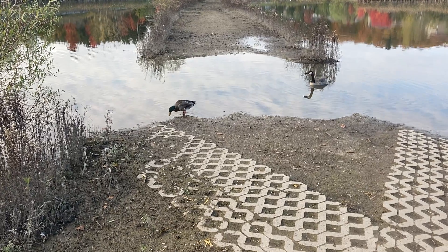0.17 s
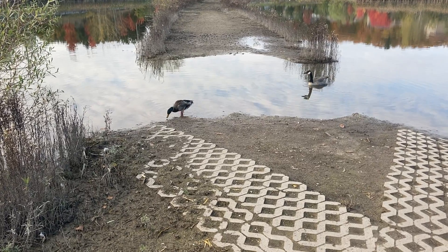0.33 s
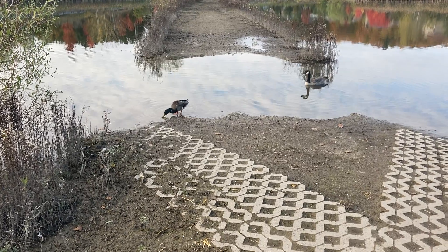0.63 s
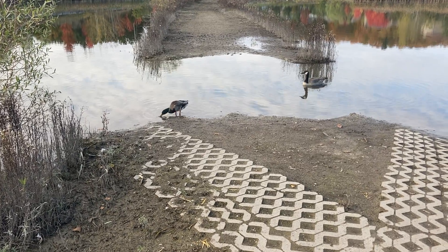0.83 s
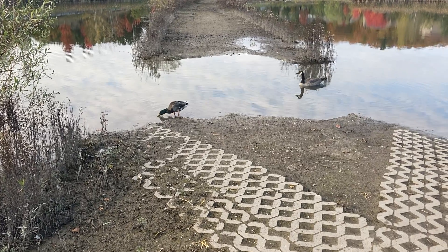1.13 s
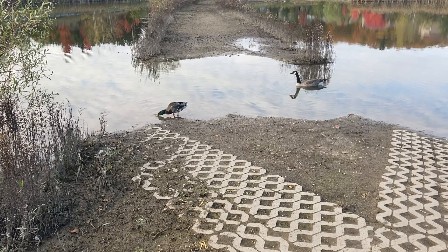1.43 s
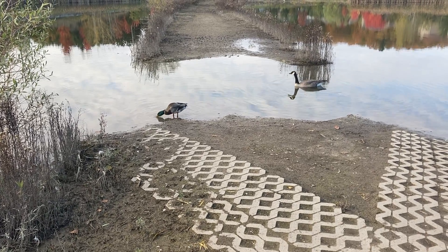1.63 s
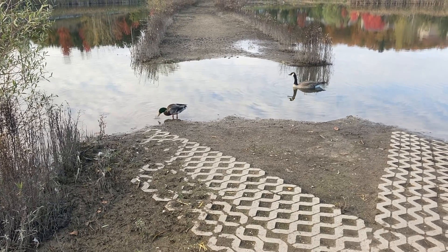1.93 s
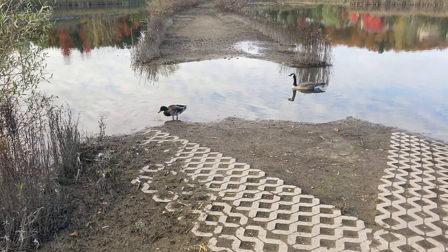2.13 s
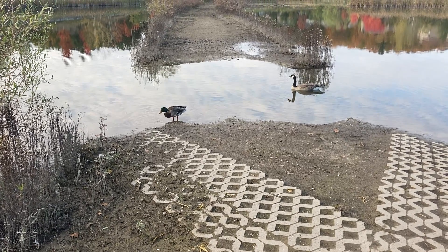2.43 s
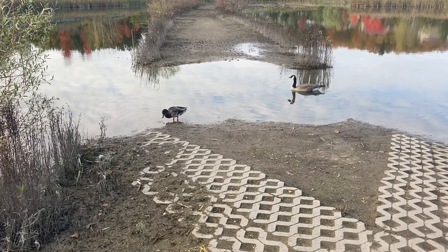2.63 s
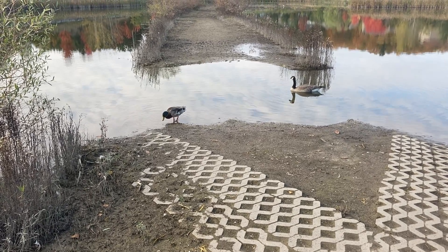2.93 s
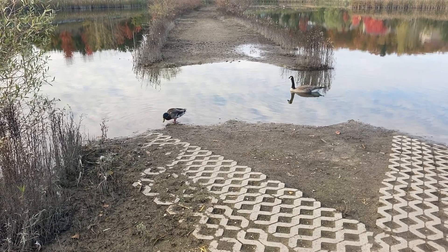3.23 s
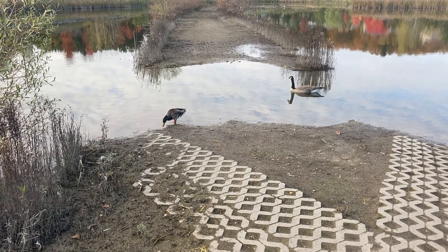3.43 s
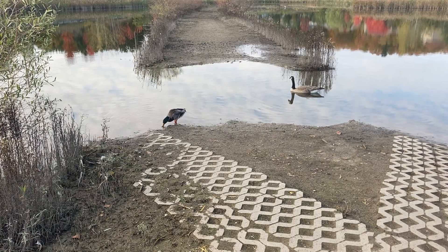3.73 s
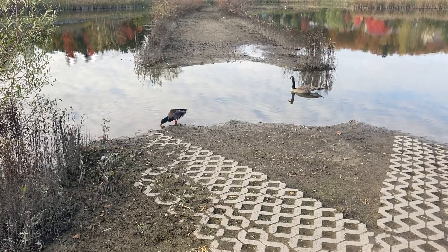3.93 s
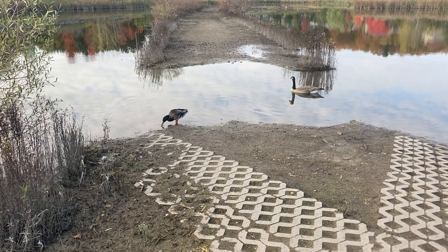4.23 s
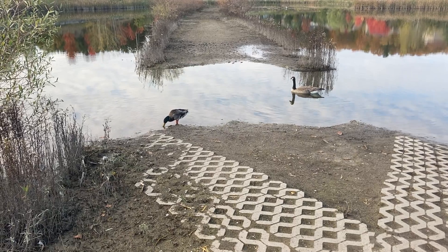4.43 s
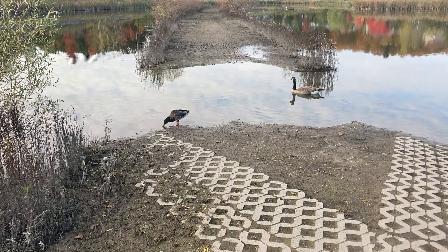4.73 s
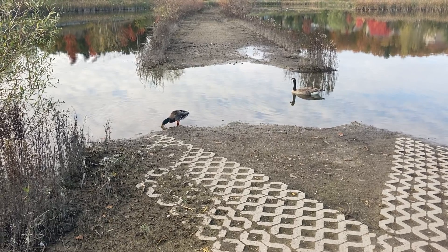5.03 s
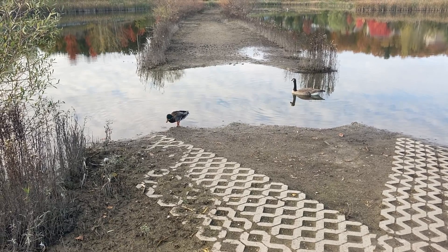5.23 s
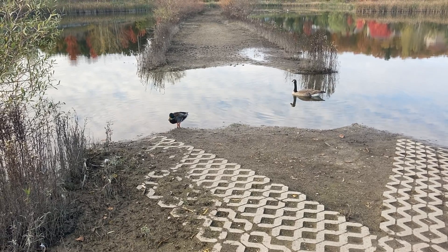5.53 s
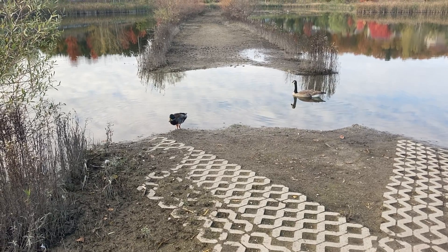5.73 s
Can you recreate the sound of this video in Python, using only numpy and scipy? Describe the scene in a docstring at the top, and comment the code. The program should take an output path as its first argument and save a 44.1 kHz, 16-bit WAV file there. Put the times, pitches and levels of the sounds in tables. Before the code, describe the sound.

A throaty eight-cylinder vehicle drones past on the left beside a calm pond, revving and easing off three times before receding.

```python
"""A V8 vehicle drives past beside a pond, off to the left, revving up and easing off three times.
Its cylinders puff unevenly into two exhaust pipes: a lopsided burble at light throttle, a fuller drone
under load. Coloured noise makes the fan and intake rush, and one cylinder chuffs once a cycle.
Soft thumps of air, faint dry crackle, a thin rattle and far squeaks pass over calm air,
and the banks answer the vehicle with a diffuse echo."""
import sys
import numpy as np
from scipy import signal
from scipy.fft import rfft, irfft, next_fast_len
from scipy.io import wavfile
from scipy.ndimage import map_coordinates

SR = 44100
rng = np.random.default_rng(int(sys.argv[2]) if len(sys.argv) > 2 else 0)


def dump_mix(stems):
    """Bounce the given channels to the path in sys.argv[1] as a 16-bit WAV at rate SR."""
    frames = np.atleast_2d(stems).T  # one column per channel
    limited = np.clip(frames, -1, 1)  # hard clip at full scale
    pcm = np.round(limited * 32767).astype(np.int16)
    wavfile.write(sys.argv[1], SR, pcm)


N = 258867

IDLE_HZ = 100  # firings per second
PASS_S, PASS_WIDTH_S = 2.83, 0.51  # nearest moment; time to drive as far as the road is distant
IDLE_BRIGHT_DB, BRIGHT_DB_PER_OCTAVE = -6.5, 18  # the upper orders of the puffs grow with engine speed
TOP_HZ = 15100


def amp(db):
    """Decibels to gain."""
    return 10 ** (np.asarray(db) / 20)


def unit(x):
    """Scale to rms 1."""
    return x / np.sqrt(np.mean(x ** 2) + 1e-20)


def seconds():
    """Time of every sample."""
    return np.arange(N) / SR


def along(points, hz):
    """Read (frequency, value) points on a log frequency axis."""
    f, v = np.transpose(points)
    return np.interp(np.log(hz + 1), np.log(f + 1), v)


def curves(rows):
    """One value per sample for each column after the time."""
    s, *columns = np.transpose(rows)
    return [np.interp(seconds(), s, column) for column in columns]


def filtered(x, response):
    """x times a response of frequency."""
    size = next_fast_len(N + 8192)
    hz = np.fft.rfftfreq(size, 1 / SR)
    return irfft(rfft(x, size) * response(hz), size)[..., :N]


def coloured(x, spectrum):
    """x with the given colour, at rms 1."""
    return unit(filtered(x, lambda hz: amp(along(spectrum, hz))))


def noise(spectrum):
    """Coloured noise of rms 1."""
    return coloured(rng.standard_normal(N), spectrum)


def ring(x, spectrum, size=16384):
    """x through a causal (minimum-phase) body of the given colour."""
    hz = np.fft.rfftfreq(size, 1 / SR)
    cepstrum = irfft(np.log(amp(along(spectrum, hz))))
    # folding the cepstrum makes the body answer only after it is struck
    cepstrum[1:size // 2] *= 2
    cepstrum[size // 2 + 1:] = 0
    response = irfft(np.exp(rfft(cepstrum)))
    return signal.fftconvolve(x, response)[:N]


def resonant(table, hz):
    """Gain of (centre_hz, width_hz, gain_db) resonances at the given frequencies."""
    return sum(amp(db) / np.hypot(1, 2 * (hz - centre) / width) ** 2 for centre, width, db in table)


def wobble(rate):
    """A smooth random curve with rate knots a second."""
    knots = rng.standard_normal(int(N * rate / SR) + 4)
    return map_coordinates(knots, [np.arange(N) * rate / SR])


def swell(s, rise, fall):
    """A smooth bump of height 1 at time s."""
    t = seconds() - s
    return np.exp(-.5 * (t / np.where(t < 0, rise, fall)) ** 2)


def turning(middle_s, turn_s):
    """A smooth turn from 0 to 1, halfway at middle_s."""
    return 1 / (1 + np.exp((middle_s - seconds()) / turn_s))


def blows(rows, t60, attack_s):
    """Envelope of (start_s, level_db) blows that rise quickly and die away."""
    age = np.arange(SR // 8) / SR
    out = np.zeros(N)
    for s, db in rows:
        out[round(s * SR):][:len(age)] += amp(db - 60 * age / t60) * (1 - np.exp(-age / attack_s))
    return out


# engine speed: time_s, firing_rate_hz
ENGINE_SPEED = [(0.0, 98.09), (0.38, 110.74), (1.14, 132.78), (1.76, 153.43), (2.0, 157.25), (2.32, 137.19),
                (2.67, 142.07), (2.79, 145.62), (3.03, 147.16), (3.56, 153.02), (3.79, 125.82),
                (3.88, 120.83), (4.43, 124.36), (5.3, 128.77), (5.44, 113.66), (5.63, 101.61),
                (5.87, 99.51)]


def firing_rate():
    """Firings per second of all cylinders together."""
    return curves(ENGINE_SPEED)[0]


def revs():
    """Engine speed in octaves above idle."""
    return np.log2(firing_rate() / IDLE_HZ)


def passing(idle_db, octave_db, falloff):
    """Gain of an engine noise: it grows with speed and falls with a power of the distance."""
    distance = np.hypot(1, (seconds() - PASS_S) / PASS_WIDTH_S)
    return amp(idle_db + octave_db * revs()) / distance ** falloff


# the driver's throttle: time_s, exhaust_gain_db (before each layer's own gain), load (0-1)
THROTTLE = [(0.0, 28.5, 0.5), (0.3, 28.5, 0.48), (0.9, 30.5, 0.69), (1.4, 34.5, 0.81), (1.7, 36.5, 0.9),
            (2.05, 37.5, 0.97), (2.4, 36.5, 0.74), (2.7, 36.5, 0.9), (3.0, 38, 0.95), (3.675, 37, 1.0),
            (3.715, 36.5, 0.63), (4.05, 34, 0.65), (4.8, 31.5, 0.62), (5.3, 32.5, 0.68), (5.5, 32, 0.55),
            (5.87, 28, 0.6)]


def drive():
    """Exhaust gain (dB), load (0-1) and brightness (dB); brightness follows engine speed."""
    level_db, load = curves(THROTTLE)
    return level_db, load, IDLE_BRIGHT_DB + BRIGHT_DB_PER_OCTAVE * revs()


# in firing order: pipe (0 or 1), strength_coasting, strength_loaded (both relative, before scatter),
# lateness_coasting, lateness_loaded (firing intervals, before jitter)
CYLINDERS = [(0.0, 0, 0.78, 0.3, 0.179), (1.0, 0.0, 0.32, 0.32, 0.038), (0.0, 0.0, 0.45, 0.83, 0.63),
             (1.0, 0.16, 0.29, 0.5, 0.077), (1.0, 0.58, 0.1, 0.22, 0.27), (0.0, 0.33, 0.5, 0.66, 0.082),
             (1.0, 0.14, 0.15, 0.52, -0.075), (0.0, 1, 0.47, 0.42, -0.068)]
# colour of each exhaust pipe: frequency_hz, gain_db
PIPE_A = [(30.0, -28), (55.0, -29), (78.0, 11.5), (105.0, 6), (150.0, -2.5), (190.0, -2.5), (225.0, -3),
          (255.0, -3.5), (310.0, -41), (360.0, -19.5), (440.0, -24), (510.0, -20), (600.0, -31.5),
          (900.0, -75)]
PIPE_B = [(30.0, -28.5), (55.0, -2.5), (78.0, 14), (105.0, 2.5), (150.0, 17), (190.0, 13), (225.0, -15),
          (255.0, 0.5), (310.0, 2.5), (360.0, -10.5), (440.0, -17), (510.0, -18), (600.0, -53.1),
          (900.0, -77.5)]
# colour of the turbulent exhaust gas: frequency_hz, level_db (per Hz, relative)
GAS = [(20, -13.5), (45, -7), (80, -8), (170, -12.5), (300, -2), (420, -3.5), (520, -30), (700, -39),
       (1200, -45), (3000, -100)]


def exhaust(firings, knee_hz=220, pulse_db=-6, gas_db=-78, gas_load_db=4):
    """One puff per firing rings its pipe; load changes each cylinder's strength and timing."""
    level_db, load, bright_db = drive()
    number = np.arange(int(firings[-1]))
    pipe, light, heavy, late_light, late_heavy = np.array(CYLINDERS)[number % len(CYLINDERS)].T
    pull = np.clip(np.interp(number, firings, load), 0, 1)
    scatter_db, jitter = 1.0, .016  # jitter in firing intervals
    chance = rng.standard_normal((len(number), 2))
    strength = (light + pull * (heavy - light)) * amp(scatter_db * chance[:, 0])
    late = late_light + pull * (late_heavy - late_light) + jitter * chance[:, 1]
    at = np.minimum(np.searchsorted(firings, number + late), N - 1)
    second = pipe > .5
    puffs_a = np.bincount(at, strength * ~second, N)
    puffs_b = np.bincount(at, strength * second, N)
    drone = ring(puffs_a, PIPE_A) + ring(puffs_b, PIPE_B)
    # the upper orders rise with engine speed
    upper = filtered(drone, lambda hz: 1 - 1 / (1 + (hz / knee_hz) ** 4))
    drone = drone + (amp(bright_db) - 1) * upper
    # turbulent gas rushes out of the pipes too, more of it under load
    gas = amp(gas_db + gas_load_db * load) * noise(GAS)
    return amp(level_db) * (amp(pulse_db) * drone + gas)


# engine orders that boom in the silencer: order (multiple of the cycle rate),
# gain_coasting_db, gain_loaded_db (both relative)
BOOM = [(5.0, -42.5, -42.5), (7.0, -35.5, -34.5), (9.0, -42.5, -34.5), (13.0, -48.5, -56),
        (15.0, -43.5, -23.5), (16.0, -26, -56.5), (17.0, -38.5, -44.5), (18.0, -68.5, -33.5),
        (19.0, -35.5, -48.5), (21.0, -31, -27), (22.0, -37.5, -48.5), (23.0, -43.5, -40),
        (25.0, -46.5, -46), (26.0, -65, -44.5), (27.0, -36.5, -66), (29.0, -42.5, -59.5),
        (30.0, -45, -45.5), (31.0, -48.5, -43)]
# the silencer's resonances: centre_hz, width_hz, gain_db
SILENCER = [(104.6, 7.1, 6.5), (143, 6.8, 0), (242.9, 46.6, -2.5), (281.9, 8.6, -3), (335, 43, -2.5),
            (379.2, 11, -4), (466.6, 8.2, -6), (505, 8.9, 5.5), (523, 12, -3.5), (592, 13, -6)]


def boom(firings, lead=-0.0091, light_load=0.65, heavy_load=1.0, boom_db=-36, bright_share=0.32):
    """Single orders sing out as engine speed carries them through the silencer's resonances."""
    level_db, load, bright_db = drive()
    cycle_hz = firing_rate() / len(CYLINDERS)
    cycle = firings / len(CYLINDERS) + lead
    pull = np.clip((load - light_load) / (heavy_load - light_load), 0, 1)
    hz = np.arange(800)
    gain = resonant(SILENCER, hz)
    tones = np.zeros(N)
    for k, light, heavy in BOOM:
        k = round(k)
        # orders above the firing rate take a share of the puffs' brightness
        db = light + pull * (heavy - light) + bright_share * bright_db * (k > len(CYLINDERS))
        level = amp(db + 1.7 * wobble(8)) * np.interp(k * cycle_hz, hz, gain)
        tones += level * np.cos(2 * np.pi * k * cycle)
    return amp(level_db + boom_db) * tones


# firing rates at which the pipes hum: centre_hz, width_hz, gain_db
HUM = [(99.5, 12, -28), (165, 1.7, -29)]


def hum(firings, late=0.44):
    """The summed flow pumps the pipe mouths once per firing, loudest when the pipes resonate."""
    tone = unit(np.cos(2 * np.pi * (firings - late)))
    return resonant(HUM, firing_rate()) * amp(wobble(22)) * tone


def lope(firings, lead=0.1, even_load=0.97):
    """At light throttle the two banks take turns, so the exhaust throbs twice in each engine cycle."""
    depth_db = 3.5  # per unit of missing load
    slack = np.clip(even_load - drive()[1], 0, 1)
    return amp(depth_db * slack * np.cos(4 * np.pi * (firings / len(CYLINDERS) - lead)))


def shaded(x, shade_db=-6.0, edge_hz=340, clear_s=1.4, turn_s=.25):
    """From ahead, the vehicle's body hides the tailpipes and dulls their upper range."""
    upper = filtered(x, lambda hz: 1 - 1 / (1 + (hz / edge_hz) ** 8))
    hidden = 1 - turning(clear_s, turn_s)
    return x + (amp(shade_db * hidden) - 1) * upper


# the fan heard from the front, while the vehicle approaches: frequency_hz, level_db (per Hz, relative)
FAN_FRONT = [(150, -17.5), (380, -9.5), (560, -2), (800, -4), (1200, -8), (1550, 0.5), (1900, -0.5),
             (2300, -9.5), (2750, -13), (3200, -17), (4100, -19), (5500, -30.5), (7500, -39.5),
             (15000, -61.5)]
# the fan heard from behind: frequency_hz, level_db (per Hz, relative)
FAN_BEHIND = [(150, -45.5), (500, 4.5), (800, -4.5), (1100, 0.5), (1600, 3), (2100, -4.5), (2550, -5),
              (3200, -14), (4100, -14), (5500, -55), (7500, -45.5), (15000, -62)]
# loudness of the fan's rush: time_s, gain_db (before the front and behind trims)
FAN_LEVEL = [(0, -55), (.5, -56), (1.0, -52), (1.5, -48), (1.75, -44), (2.3, -42.5), (2.6, -44),
             (3.05, -40), (3.6, -37.5), (3.8, -43), (4.05, -49), (4.5, -50), (5.3, -51.5), (5.87, -54)]
# colour of the intake hiss: frequency_hz, level_db (per Hz, relative)
HISS = [(500, -46), (1300, -24.5), (2700, -1), (3400, 3.5), (4400, -0.5), (5500, -6.5), (7000, -15),
        (8200, -23.5), (11000, -40), (14000, -58.5)]
# surges of intake hiss: peak_s, rise_s, fall_s, gain_db (before the surge trim)
SURGES = [(2.261, 0.22, 0.23, -53.5), (3.131, 0.21, 0.38, -50)]


def engine_air(firings, flutter=0.074, rough_db=1.3, behind_db=3, front_db=3, surge_db=5.0,
               abreast_s=2.18, turn_s=0.33):
    """Fan rush and intake hiss flutter at the firing rate; the fan turns from its front to its back."""
    behind = turning(abreast_s, turn_s)
    front_rush = np.sqrt(1 - behind) * amp(front_db) * noise(FAN_FRONT)
    behind_rush = np.sqrt(behind) * amp(behind_db) * noise(FAN_BEHIND)
    fan_level = amp(curves(FAN_LEVEL)[0] + 0.64 * wobble(9.1) + rough_db * wobble(160))
    surges = sum(amp(db + surge_db) * swell(*shape) for *shape, db in SURGES)
    hiss_level = passing(idle_db=-70.5, octave_db=20.5, falloff=.45) + surges
    beat = 1 + flutter * np.cos(2 * np.pi * firings)
    return beat * (fan_level * (front_rush + behind_rush) + hiss_level * noise(HISS))


# the hardest chuffs, as the vehicle comes abreast: start_s, level_db (before the attack)
HARD_CHUFFS = [(2.540, -43.5), (2.654, -37.5), (2.710, -39), (2.765, -44), (2.821, -38), (2.876, -35.5),
               (2.929, -29), (2.984, -29), (3.037, -25.5), (3.092, -40), (3.147, -37), (3.201, -33.5),
               (3.256, -39.5), (3.309, -32), (3.362, -36.5), (3.413, -32.5), (3.467, -39), (3.519, -37),
               (3.571, -32), (3.625, -41.5)]
# colour of the chuffs: frequency_hz, level_db (per Hz, relative)
RASP = [(300, -21.5), (700, 0.5), (1300, 6.5), (2100, 0.5), (2700, 6.5), (3400, -5), (4600, -5),
        (5600, -15), (7200, -15.5), (9000, -43.5), (11300, -28.5), (13000, -61.5), (15000, -79)]


def chuff(firings, lead=0.042):
    """One cylinder spits a burst of gas in every engine cycle, hard at high speed."""
    rise, decay, scatter_db = .04, .11, 2.5  # rise and decay in engine cycles; spread of burst sizes in dB
    cycle, phase = np.divmod(firings / len(CYLINDERS) + lead, 1)
    sizes = amp(scatter_db * rng.standard_normal(int(cycle[-1]) + 1))
    burst = (1 - np.exp(-phase / rise)) * np.exp(-phase / decay) * sizes[cycle.astype(int)]
    steady = passing(idle_db=-70.5, octave_db=42.0, falloff=0.98) * unit(burst)
    hard = blows(HARD_CHUFFS, t60=0.052, attack_s=0.0012)
    return (steady + hard) * noise(RASP)


# still air over the water: frequency_hz, level_db (per Hz, relative)
CALM = [(20, -22), (50, -14), (100, -5.5), (400, -22), (700, -22), (1200, -24), (2500, -36.5), (4200, -38),
        (6000, -50.5), (9000, -69.5), (15000, -72.5)]


def calm_air():
    """Still air is steady coloured noise, independent at each microphone."""
    return amp(-45.5) * np.array([noise(CALM), noise(CALM)])


# soft low thumps of air on the microphones: peak_s, level_db
THUMPS = [(0.081, -35), (.98, -35), (4.03, -35.5)]


def thumps(rise_s=0.021, fall_s=0.027):
    """Soft puffs of air, heard as short swells of deep noise."""
    deep = noise([(22, -31.5), (45, -1.0), (70, -0.5), (160, -42.5), (600, -120)])
    return deep * sum(amp(db) * swell(s, rise_s, fall_s) for s, db in THUMPS)


# bouts of dry crackle: start_s, length_s, level_db (before the fades), grains_per_s
RUSTLES = [(0.478, 0.2, -70, 240), (0.757, 0.56, -71, 1100), (1.194, .7, -70, 3200)]
# sharp ticks: start_s, level_db (before the attack); the ones after 2.9 s are the crack of the hardest chuffs
TICKS = [(0.5436, -54.5), (0.5554, -53), (0.581, -62.5), (0.6419, -60), (0.812, -65.5), (0.865, -65.5),
         (0.952, -62), (1.05, -58.5), (1.523, -63.5), (1.6506, -52.5), (1.75, -62), (2.986, -52),
         (3.0385, -45.5), (3.094, -51), (3.4145, -56)]
# colour of the crackle: frequency_hz, level_db (relative)
CRACKLE = [(1500, -31.5), (4000, -55.5), (6500, 6.5), (9000, -8), (11000, 7.5), (12500, -15.5),
           (15000, -27)]


def crackle(fade_s=0.071):
    """Bouts of tiny random dry grains that fade in and out, with a few sharper ticks; the later ticks crack
    along with the hardest chuffs."""
    t = seconds()
    bed = np.zeros(N)
    for s, length, db, grains_per_s in RUSTLES:
        grains = (rng.random(N) < grains_per_s / SR) * rng.standard_normal(N)
        uneven = coloured(grains * amp(2.5 * wobble(23)), CRACKLE)
        fade = np.clip(np.minimum(t - s, s + length - t) / fade_s, 0, 1)
        bed += amp(db) * fade * uneven
    return bed + blows(TICKS, t60=0.024, attack_s=.0002) * noise(CRACKLE)


# brief chirps of the rattle: peak_s, level_db
CHIRPS = [(3.985, -49), (4.57, -59), (4.625, -51.5)]


def rattle(from_s=2.0, centre_hz=2480, width_hz=300, chirp_s=0.0065):
    """A thin band of noise rattles in brief flecks once the front of the vehicle has gone by."""
    hiss = rng.standard_normal(N)
    band = unit(filtered(hiss, lambda hz: resonant([(centre_hz, width_hz, 0)], hz)))
    flicker_db = 4
    flecks = passing(idle_db=-62.5, octave_db=12.5, falloff=0.65) * unit(amp(flicker_db * wobble(22)))
    chirps = sum(amp(db) * swell(s, chirp_s, chirp_s) for s, db in CHIRPS)
    return band * (flecks * (seconds() > from_s) + chirps)


# faint distant squeaks: start_s, length_s, fundamental_hz (mid-glide), level_db (at mid-squeak)
SQUEAKS = [(4.65, 0.11, 424, -68), (5.058, 0.16, 430, -65), (5.42, 0.061, 420, -67)]


def squeaks(glide=0.033, waver=0.0064):
    """Thin rising squeaks, of which only a few high partials carry."""
    out = np.zeros(N)
    partials = np.arange(9, 13)[:, None]
    for s, length, hz, db in SQUEAKS:
        u = np.linspace(0, 1, round(length * SR))
        pitch = hz * (1 + glide * (u - .5) + waver * wobble(170)[:len(u)])
        phase = 2 * np.pi * np.cumsum(pitch) / SR
        voice = unit((np.sin(partials * phase) / partials ** 2).sum(0))
        out[round(s * SR):][:len(u)] += amp(db) * np.sin(np.pi * u) * voice
    return out


# bearing of the vehicle: time_s, right_delay_ms
LAG = [(0, .435), (1.5, .445), (3.2, .43), (4.2, .415), (5.87, .395)]
# tilt between the microphones: frequency_hz, left_minus_right_db
BALANCE = [(60, -1.3), (150, -1.5), (250, -.2), (340, 1.8), (500, 3.5), (720, 4.5), (1100, 1), (1620, -4),
           (2200, 1.5), (2700, -1), (11000, -1.5)]
# the body between the microphones bends the sound: frequency_hz, left_lead_coming_rad, left_lead_leaving_rad
BEND = [(60, .04, 0), (110, 0.49, 0.057), (160, 0.13, -0.0077), (320, .27, -0.12), (482, .18, -0.052),
        (680, -0.32, 0.22), (850, -0.4, -.2), (1220, -0.34, -1.1), (1600, -0.66, -1.4), (2000, -0.35, -.5),
        (2500, -0.0032, -0.15), (2980, 0.47, .5), (4200, -0.14, -0.67)]


def microphones(x, leaving_s=3.5, change_s=0.23):
    """Sound from the left reaches the right microphone later, coloured by the body between them."""
    delay = curves(LAG)[0] * SR / 1000  # samples
    right = map_coordinates(x, [np.arange(N) - delay], mode="nearest")
    pair = np.array([x, right])
    halves = np.array([[.5], [-.5]])  # each side takes half of the difference

    def heard(lead):
        def response(hz):
            return (amp(along(BALANCE, hz)) * np.exp(1j * along(lead, hz))) ** halves
        return filtered(pair, response)

    coming = [(hz, lead) for hz, lead, _ in BEND]
    going = [(hz, lead) for hz, _, lead in BEND]
    leaving = turning(leaving_s, change_s)
    return (1 - leaving) * heard(coming) + leaving * heard(going)


# echo from the banks and trees: frequency_hz, t60_s
SHORE = [(100, 1), (1000, 0.51), (8000, 0.16)]


def shore(x, wet_db=-13):
    """Diffuse answer of the banks, different at each microphone; bass is hardly scattered."""
    hz, t, grains = signal.stft(rng.standard_normal((2, SR // 2)), SR, nperseg=256)
    decay = amp(-60 * t / along(SHORE, hz)[:, None])
    tail = signal.istft(grains * decay, SR, nperseg=256)[1]
    tail = tail / np.linalg.norm(tail[0])
    echo = signal.fftconvolve(x[None], tail, axes=1)[:, :N]
    scattered = [(150, -22), (330, -15), (600, -4), (3000, 0), (6000, 6)]  # frequency_hz, gain_db
    return amp(wet_db) * filtered(echo, lambda hz: amp(along(scattered, hz)))


def scene():
    """The vehicle, its echo, far squeaks, thumps and the calm air."""
    firings = np.cumsum(firing_rate()) / SR
    drone = (exhaust(firings) + boom(firings) + hum(firings)) * lope(firings)
    # the drone wavers a little on its way through the open air
    drone = drone * amp(0.85 * wobble(9))
    vehicle = shaded(drone) + engine_air(firings) + chuff(firings) + crackle() + rattle()
    return microphones(vehicle) + shore(vehicle) + calm_air() + thumps() + squeaks()


def record(dry):
    """Nothing is kept above the band limit."""
    return filtered(dry, lambda hz: hz < TOP_HZ)


dry = scene()
out = record(dry)
dump_mix(out)
```